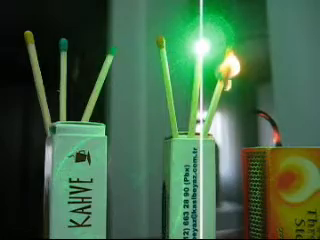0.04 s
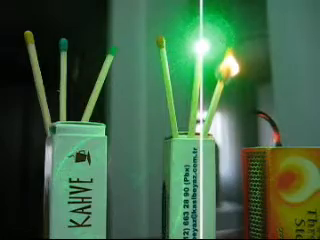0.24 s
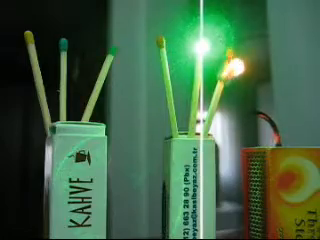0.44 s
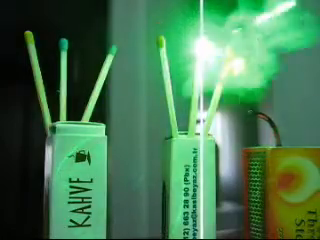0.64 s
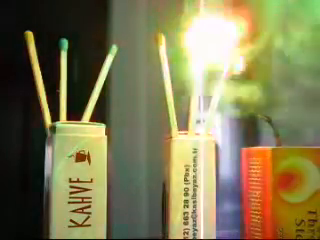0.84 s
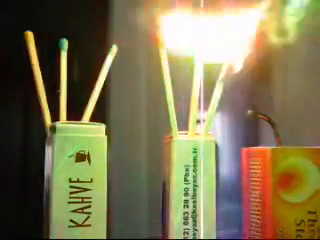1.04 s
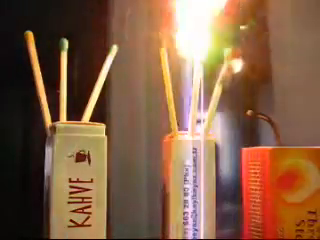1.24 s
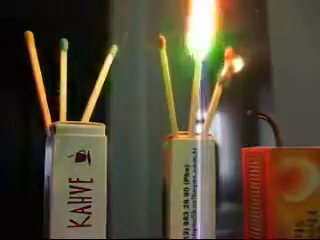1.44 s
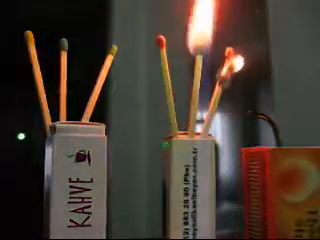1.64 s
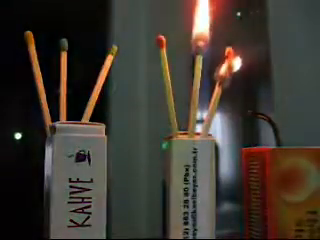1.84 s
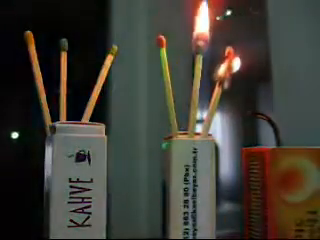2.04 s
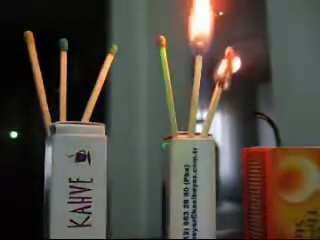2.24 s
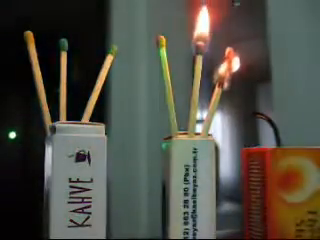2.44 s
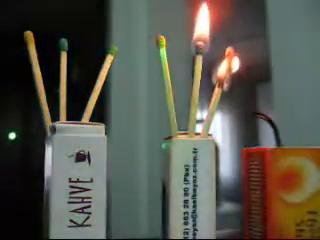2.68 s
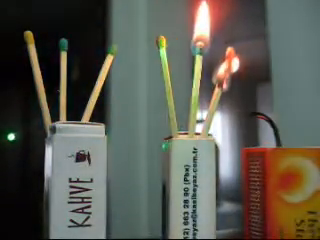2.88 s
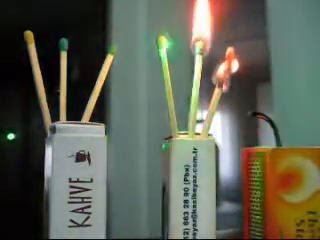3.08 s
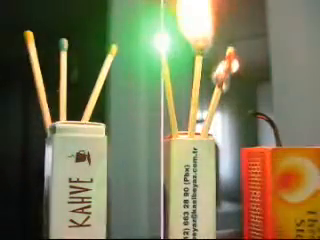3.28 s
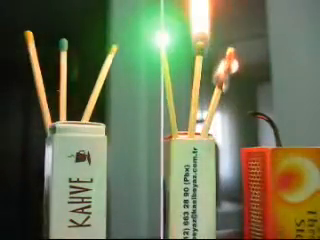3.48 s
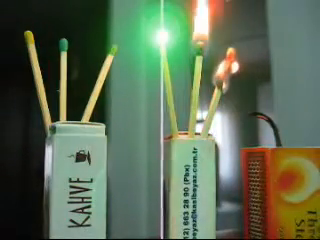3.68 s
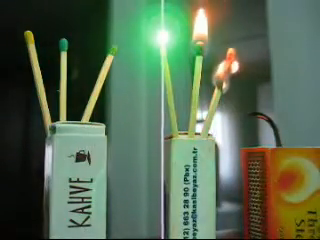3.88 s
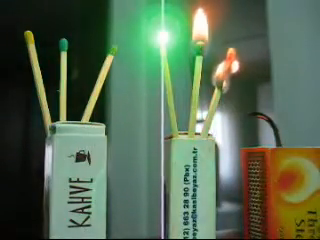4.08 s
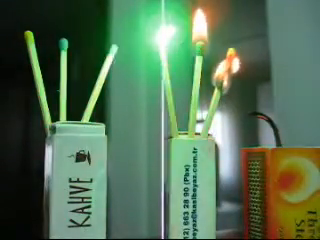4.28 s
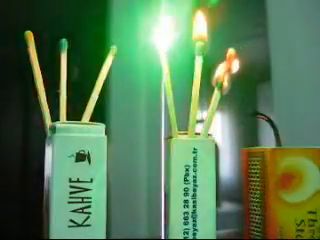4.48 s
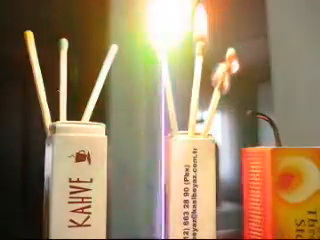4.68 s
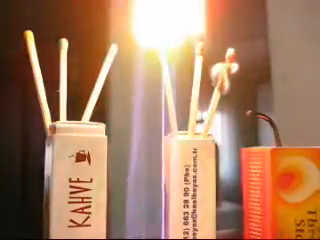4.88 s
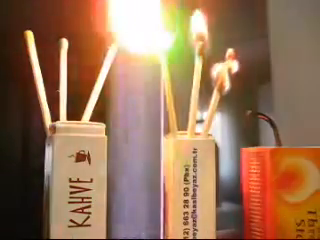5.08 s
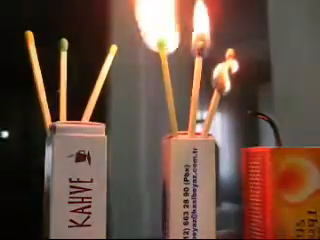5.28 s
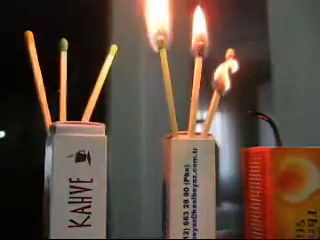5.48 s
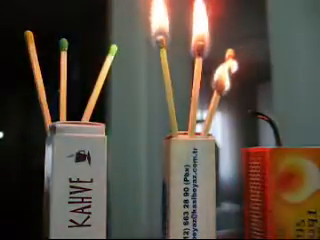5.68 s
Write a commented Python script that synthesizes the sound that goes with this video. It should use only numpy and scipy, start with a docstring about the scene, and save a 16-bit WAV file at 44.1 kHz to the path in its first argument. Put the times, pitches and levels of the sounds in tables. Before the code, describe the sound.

Two matches ignite close to the microphone on a desk, several seconds apart. Each begins with barely audible fizzing, cracks with a hard, overloaded pop, then sprays a sputtering gas hiss full of tiny snaps, with a low flutter of moving air. Between them only fan hum, faint high whine, soft bumps and an occasional tick remain. The room adds a short, faint tail; the treble is grainy.

```python
"""A cooling fan hums and electronics whine throughout; then a laser lights two match heads on a desk.
Each head sizzles (faint noise and grains), bursts with a sharp pop (a pressure pulse and its rebound) and
flares for under a second: gas hisses (shaped noise), grains crackle and snap (short bursts), and the
flame's draught rumbles (low noise). A few soft handling knocks are filtered impulses.
The microphone is close; desk, boxes and room add reflections, and a low-rate recorder roughens the treble."""
import sys
import numpy as np
from scipy import signal
from scipy.fft import rfft, irfft, next_fast_len
from scipy.io import wavfile
from scipy.ndimage import map_coordinates

SR = 44100
rng = np.random.default_rng(int(sys.argv[2]) if len(sys.argv) > 2 else 0)


def unload_wav(signal):
    """Save mono or channel-first audio to the path in sys.argv[1] as 16-bit WAV at rate SR, clipped to [-1, 1]."""
    wavfile.write(
        sys.argv[1],
        SR,
        np.round(np.clip(np.atleast_2d(signal).T, -1, 1) * 32767).astype(np.int16),
    )


N = 252252
RECORDER_HZ, TOP_HZ = 11025, 12800  # sample rate; output cutoff


def amp(db):
    """Decibels to gain."""
    return 10 ** (np.asarray(db) / 20)


def ramp(x):
    """0 below 0, 1 above 1, straight between."""
    return np.clip(x, 0, 1)


def along(points, hz):
    """Interpolate (Hz, value) points on a log frequency axis."""
    f, v = np.transpose(points)
    return np.interp(np.log(hz + 1), np.log(f + 1), v)


def curves(rows):
    """One value per sample for each column after the time."""
    s, *cols = np.transpose(rows)
    return [np.interp(np.arange(N) / SR, s, c) for c in cols]


def wobble(knots_per_s):
    """Smooth random curve through normally distributed knots."""
    knots = rng.standard_normal(int(N * knots_per_s / SR) + 4)
    return map_coordinates(knots, [np.arange(N) * knots_per_s / SR])


def filtered(x, response):
    """x times a complex response of frequency, zero-padded."""
    m = 2 * next_fast_len(N // 2 + SR // 4)
    return irfft(rfft(x, m) * response(np.fft.rfftfreq(m, 1 / SR)), m)[:N]


def in_band(hz):
    """Steep low-pass at half the recorder's sample rate."""
    return 1 / (1 + (2 * hz / RECORDER_HZ) ** 60)


def coloured(x, spectrum):
    """x through a causal (minimum-phase) filter, at rms 1 within the recorder's band."""
    def response(hz):
        cepstrum = irfft(np.log(amp(along(spectrum, hz))))
        return np.exp(rfft(2 * cepstrum[:len(hz)], len(cepstrum)) - cepstrum[0])
    y = filtered(x, response)
    return y / np.std(filtered(y, in_band))


def noise(spectrum):
    """Coloured noise, rms 1 in band."""
    return coloured(rng.standard_normal(N), spectrum)


def add(track, s, sound):
    """Mix a sound into the track from time s."""
    part = track[round(s * SR):][:len(sound)]
    part += sound[:len(part)]


# crust of a head cracks open: [t/s, level/dB before the bass cut, push length/s, rebound decay/s]
POPS = [(0.7644, -3.5, 0.00017, 0.000049), (0.7647, 4, 0.00018, 0.00061), (4.5287, 1, 0.00024, 0.00067)]
# gas jet spectrum, also of spray and sizzle: [f/Hz, relative density/dB]
JET_SPECTRUM = [(60, -35), (200, -5.5), (480, 5), (700, 1), (1000, -1.5), (1400, 3), (2300, -1), (3200, 1),
                (4100, -6), (5500, 0.5)]


def pops(spray_db=-18, spray_t60=0.017):
    """The crust gives way: a brief pressure pulse flips into its rebound, with a spray of fragments."""
    out, t = np.zeros(N), np.arange(N) / SR
    for s, db, push_s, rebound_s in POPS:
        before, after = np.maximum(s - t, 0), np.maximum(t - s, 0)
        push = -np.exp(-(before / push_s) ** 6)
        rebound = np.exp(-after / rebound_s)
        spray = amp(spray_db - 60 * after / spray_t60) * (t > s - push_s) * noise(JET_SPECTRUM)
        out += amp(db) * (np.where(t < s, push, rebound) + spray)
    return filtered(out, lambda hz: 1j * hz / (220 + 1j * hz))  # so small a source radiates little bass


# one row per match: [sizzle t/s, sizzle level/dB, ignition t/s, burnt-out t/s, dying away/s]
MATCHES = [(0.612, -43.5, 0.765, 1.458, 0.026), (4.37, -49, 4.529, 5.278, 0.046)]
FLARE_DB, SWELL_DB, SWELL_S, HOLD_S, FADE_DB_PER_S = -26, 11, 0.032, 0.27, 12.5


def burning():
    """Gain of the gas jet: swell, hold, slow fade, and a quick end when the head is spent."""
    t, gain = np.arange(N) / SR, np.zeros(N)
    for _, _, lit, spent, dying in MATCHES:
        age = np.maximum(t - lit, 0)
        swell_db = -SWELL_DB * np.exp(-age / SWELL_S)
        fade_db = -FADE_DB_PER_S * np.maximum(age - HOLD_S, 0)
        gain += amp(FLARE_DB + swell_db + fade_db) * (t > lit) * ramp((spent - t) / dying)
    return gain


# bursting grains' spectrum: [f/Hz, relative density/dB]
CRACKLE_SPECTRUM = [(100, -11), (700, -5), (2500, 4.5), (5500, 2.5)]


def crackle(per_second, spread_db):
    """Tiny bursts at random moments, mostly small and a few large."""
    sizes = amp(spread_db * np.minimum(rng.standard_normal(N), 2))
    hits = rng.random(N) < per_second / SR
    return coloured(sizes * hits * rng.choice([-1, 1], N), CRACKLE_SPECTRUM)


def flare():
    """The head blows a sputtering gas jet; as the jet weakens, its bursting grains stand out."""
    sputter_db = .5 * wobble(35) + .5 * wobble(220)
    burn = burning() * amp(sputter_db)
    strength = burn / burn.max()
    jet = amp(-1.5) * strength ** 0.11 * noise(JET_SPECTRUM)
    return burn * (jet + amp(-5.0) * crackle(per_second=1300, spread_db=9.5))


def snap(hz, life_cycles=0.19):
    """A grain bursts in about one steep pressure cycle."""
    cycles = hz * np.arange(-SR // 500, SR // 500) / SR
    wave = np.sin(2 * np.pi * cycles) * np.exp(-np.abs(cycles) / life_cycles)
    return wave / wave.max()


# single snaps and ticks of heads and wood, loud and faint:
# [listed t/s, SNAP_LAG_S before the burst centre; level/dB before SNAP_GAIN_DB]
SNAPS = [(0.664, -22), (0.8694, -15), (0.9334, -5), (1.0134, -15), (1.0955, -8.5), (1.1926, -5.5),
         (1.4225, -12), (1.4334, -11.5), (2.5093, -18), (3.9594, -27), (4.8, -8.5), (4.9836, -9.5),
         (5.049, -9), (5.091, -9.5), (5.1487, -13), (5.1576, -10.5), (5.2427, -13.5), (5.3712, -12.5)]
SNAP_HZ, SNAP_LAG_S, SNAP_GAIN_DB = 3130, 0.001193, -0.5  # lag: listed time to burst centre


def snaps(per_second=16, over_jet_db=11, spread_db=5.0, pitch_spread=0.23):
    """Snaps at given times, and others at random that weaken with the flame."""
    out, jet = np.zeros(N), burning()
    grains = [(s + SNAP_LAG_S, amp(db + SNAP_GAIN_DB), SNAP_HZ) for s, db in SNAPS]
    for _, _, lit, spent, _ in MATCHES:
        for turn, (offset, size, pitch) in enumerate(rng.standard_normal(size=(40, 3))):
            s = lit + (turn + offset) / per_second
            if lit < s < spent:
                peak = jet[round(s * SR)] * amp(over_jet_db + spread_db * size)
                grains.append((s, peak, SNAP_HZ * np.exp(pitch_spread * pitch)))
    for s, peak, hz in grains:
        burst = peak * snap(hz)
        add(out, s - len(burst) / 2 / SR, burst)
    return out


def sizzle(rise_s=0.0069):
    """The heated spot fizzes faintly before it catches."""
    t, heat = np.arange(N) / SR, np.zeros(N)
    for start, db, lit, _, _ in MATCHES:
        heat += amp(db) * ramp((t - start) / rise_s) * (t < lit)
    return heat * (noise(JET_SPECTRUM) + amp(-2.0) * crackle(per_second=1400, spread_db=8.5))


# soft handling knocks: [t/s, level/dB]
KNOCKS = [(1.409, -16), (1.489, -31), (1.624, -15.5), (1.912, -24), (2.681, -22), (5.328, -22.5),
          (5.438, -25.5)]
# spectrum of a knock: [f/Hz, relative level/dB]
KNOCK_SPECTRUM = [(80, -13), (220, 7), (500, 9.5), (800, 3), (1300, -6), (2500, -14), (5500, -19)]


def knocks(rattle_db=-29, rattle_t60=0.16):
    """Each light bump is one dull push followed by a brief rattle of the body."""
    out, t = np.zeros(N), np.arange(SR // 8) / SR
    push = coloured(signal.unit_impulse(N), KNOCK_SPECTRUM)[:len(t)]
    push = push / np.abs(push).max()
    for s, db in KNOCKS:
        rattle = amp(rattle_db - 60 * t / rattle_t60) * rng.standard_normal(len(t))
        add(out, s, amp(db) * signal.fftconvolve((t == 0) + rattle, push))
    return out


# stray puffs of room air: [t/s, level/dB, half length/s]
PUFFS = [(0.183, -42.5, 0.092), (1.79, -39, 0.092), (2.31, -38.5, 0.078), (3.39, -38.5, 0.15)]
# spectrum of air stirring at the microphone: [f/Hz, relative density/dB]
RUMBLE_SPECTRUM = [(6, -24), (15, 0), (30, 4), (60, -1.5), (110, -11.5), (200, -20), (500, -42),
                   (2000, -100)]
# the billow reaches the microphone a little after ignition, then settles
BILLOW_DB, BILLOW_LAG_S, BILLOW_RISE_S, BILLOW_FADE_DB_PER_S, BILLOW_RELEASE_S = -28, 0.13, 0.041, 16.5, 0.11
STILL_AIR_DB = -48.5


def draught(flutter_db=1.0):
    """Air stirs at the microphone: a little always, more in stray puffs, hardest when a flame billows."""
    t = np.arange(N) / SR
    flows = [amp(db) * np.exp(-((t - s) / half) ** 2) for s, db, half in PUFFS]
    for _, _, lit, spent, _ in MATCHES:
        age = np.maximum(t - lit - BILLOW_LAG_S, 0)
        rise = ramp(age / BILLOW_RISE_S)
        release = ramp((spent - t) / BILLOW_RELEASE_S + .5)
        flows.append(amp(BILLOW_DB - BILLOW_FADE_DB_PER_S * age) * rise * release)
    flow = np.sqrt(amp(STILL_AIR_DB) ** 2 + np.sum(np.square(flows), axis=0))
    return flow * amp(flutter_db * wobble(6.5)) * noise(RUMBLE_SPECTRUM)


# background levels: [t/s, fan hum level/dB, air rush level/dB, whine level/dB]
BACKGROUND = [(0, -43.5, -42, -52.5), (4.4, -42, -42, -51.5), (4.8, -45.5, -42.5, -50),
              (5.72, -46.5, -44, -55.5)]
# fan tones: [f/Hz, level/dB re hum, pitch wander as a share]
FAN_TONES = [(196.3, 0.5, 0.0037), (392.4, -11, .0015)]
# air rush spectrum: [f/Hz, relative density/dB]
AIR_SPECTRUM = [(50, -10), (105, -4.5), (160, -7), (270, -10), (500, -16), (900, -18.5), (1600, -22),
                (2800, -23), (4200, -24.5), (5500, -23)]


def fan():
    """Blade hum, slightly unsteady in pitch and level, over a rush of air."""
    hum_db, rush_db, _ = curves(BACKGROUND)
    tones = np.zeros(N)
    for hz, db, wander in FAN_TONES:
        level = amp(db + 0.091 * wobble(30))
        cycles = np.cumsum(hz * (1 + wander * wobble(25.06))) / SR
        tones += level * np.sin(2 * np.pi * cycles)
    rush = amp(rush_db + 0.11 * wobble(9.3)) * noise(AIR_SPECTRUM)
    return np.sqrt(2) * amp(hum_db) * tones + rush


# electronic whine: [f/Hz, level/dB re main tone, phase slip/cycles]
WHINES = [(2763, 0, .37), (3160, -8, .5)]


def whine(slips_per_s=30):
    """Thin electronic tones; regular slips of phase give them a slight buzz."""
    t, tones = np.arange(N) / SR, np.zeros(N)
    _, _, whine_db = curves(BACKGROUND)
    for hz, db, slip in WHINES:
        cycles = hz * t + slip * np.floor(slips_per_s * t)
        tones += amp(db) * np.sin(2 * np.pi * cycles)
    return np.sqrt(2) * amp(whine_db) * tones


# echoes off boxes beside the matches: [delay/s, share]
ECHOES = [(.0009, 0.19), (.00135, 0.15)]
# room decay: [f/Hz, t60/s]
ROOM_T60 = [(200, 0.71), (2000, 0.17), (5500, 0.31)]


def surroundings(x, desk_delay=0.002236, desk_share=0.24, desk_hz=1400, room_db=-12):
    """Close boxes and the desk comb the sound; the room adds a short, faint tail."""
    def late(hz, delay):
        return np.exp(-2j * np.pi * hz * delay)

    def near(hz):
        boxes = sum(share * late(hz, delay) for delay, share in ECHOES)
        return boxes + desk_share * late(hz, desk_delay) / (1 + (hz / desk_hz) ** 2)
    hz, t, z = signal.stft(rng.standard_normal(SR // 3), SR, nperseg=256)
    decay = amp(-60 * t / along(ROOM_T60, hz)[:, None])
    tail = signal.istft(z * decay, SR, nperseg=256)[1]
    delayed_tail = np.pad(tail / np.linalg.norm(tail), (SR // 250, 0))
    room = signal.fftconvolve(x, delayed_tail)[:N]
    return x + filtered(x, near) + amp(room_db) * room


def scene():
    """Matches and knocks in the room, over the fan, the whine and the draught."""
    matches = pops() + flare() + snaps() + sizzle()
    return (surroundings(matches + knocks()) + fan() + whine() + draught())[None]


def record(dry):
    """Low-rate recorder: pops overload it; holding each sample mirrors the sound into the treble."""
    step = SR // RECORDER_HZ
    samples = np.clip(filtered(dry[0], in_band)[::step], -1, 1)
    held = np.repeat(samples, step)[:N]
    return filtered(held, lambda hz: 1 / (1 + (hz / TOP_HZ) ** 200))[None]


dry = scene()
out = record(dry)
unload_wav(out)
```